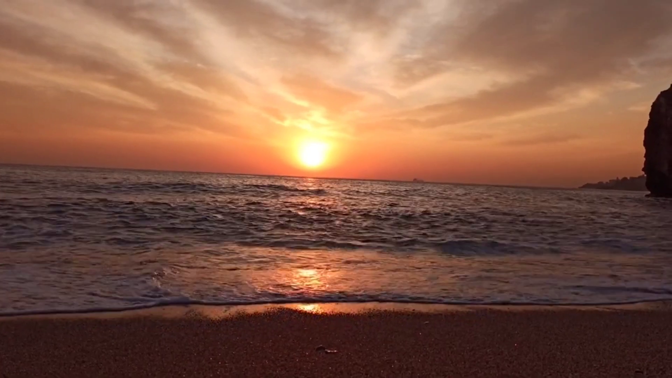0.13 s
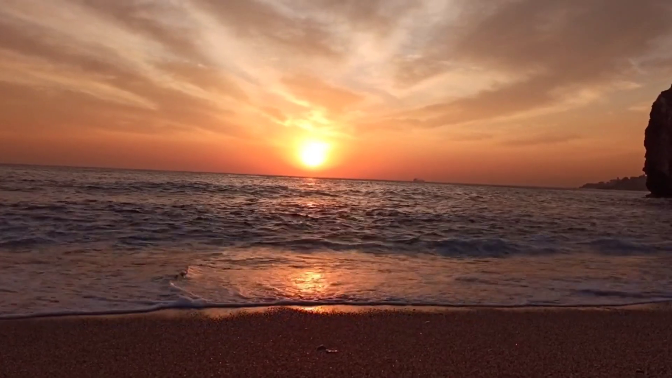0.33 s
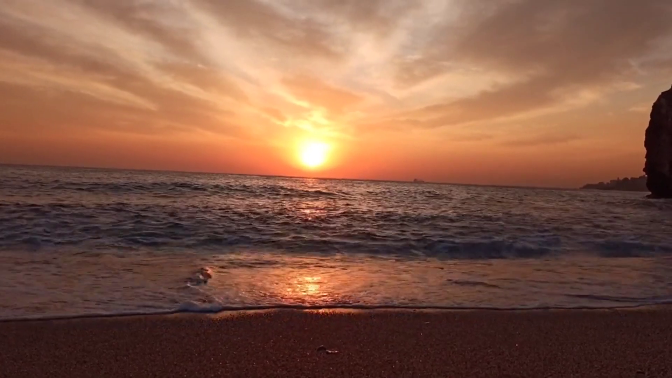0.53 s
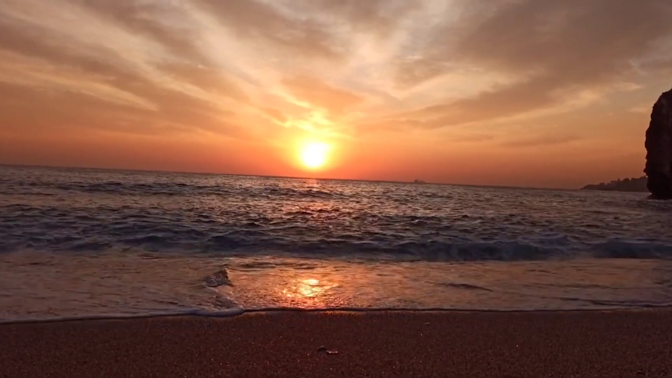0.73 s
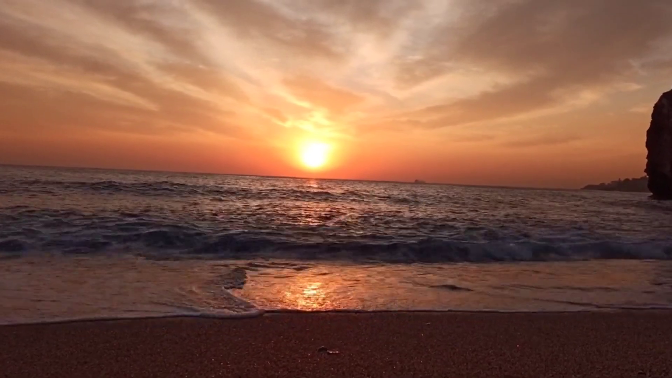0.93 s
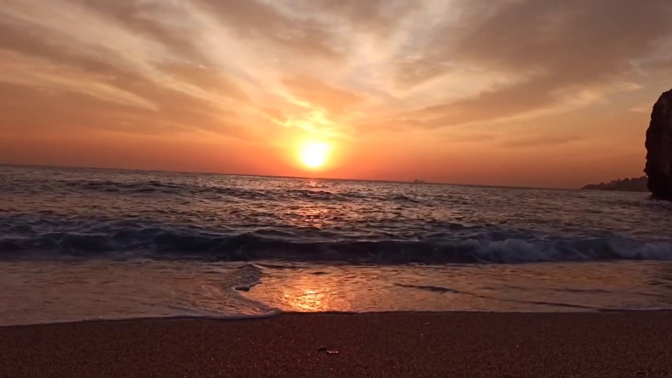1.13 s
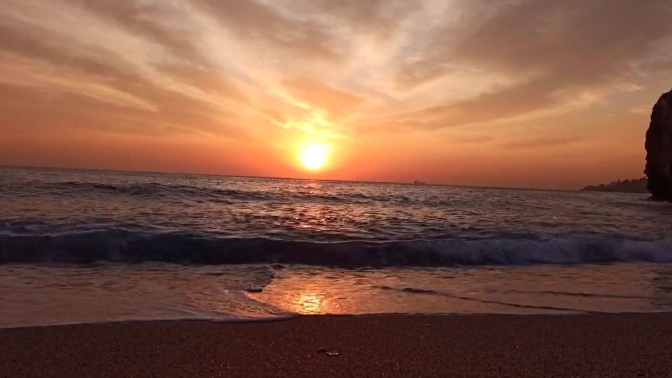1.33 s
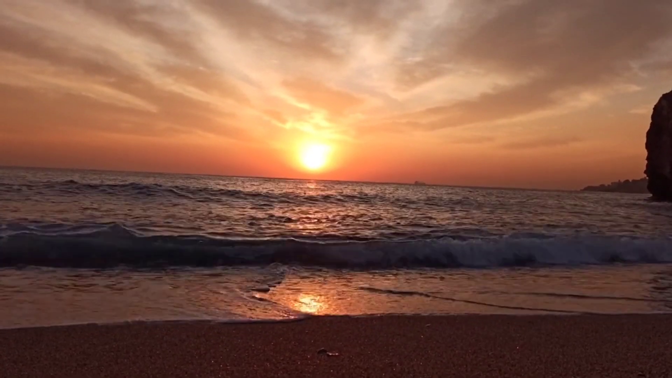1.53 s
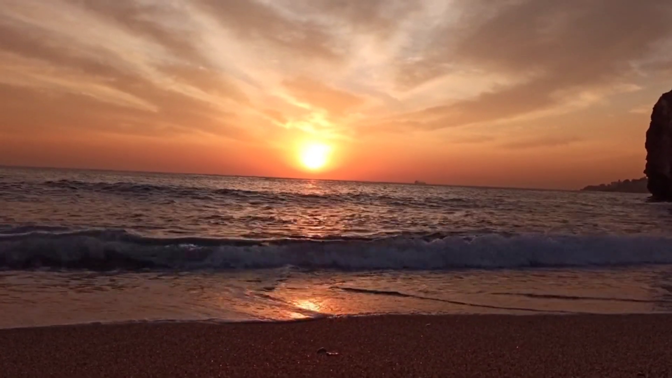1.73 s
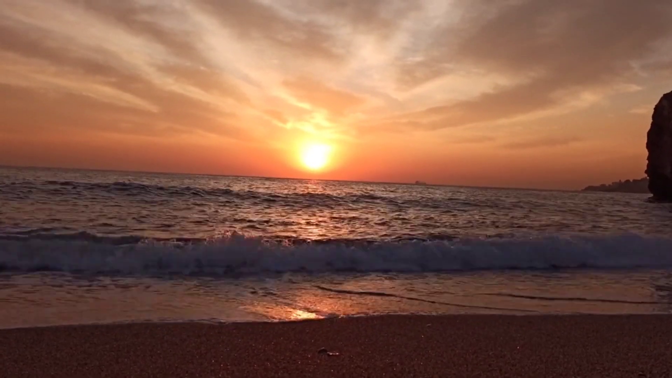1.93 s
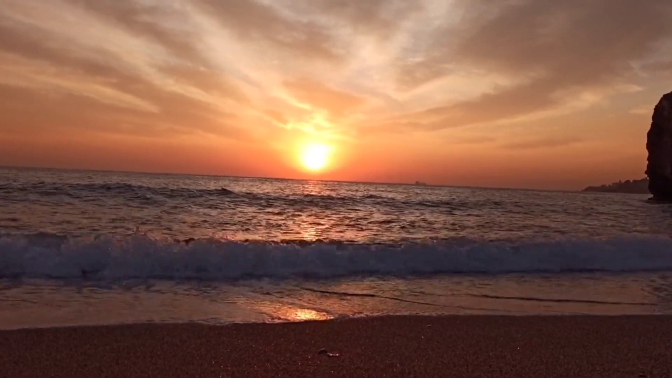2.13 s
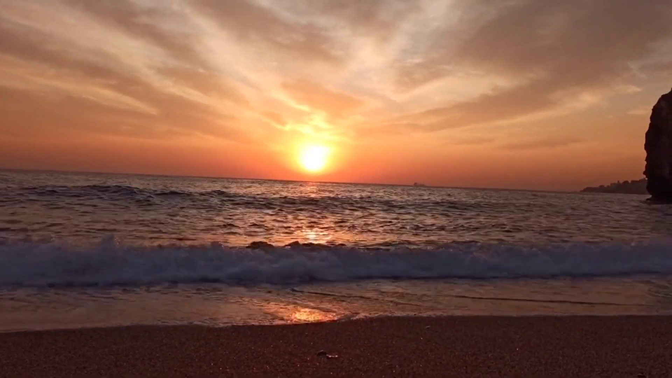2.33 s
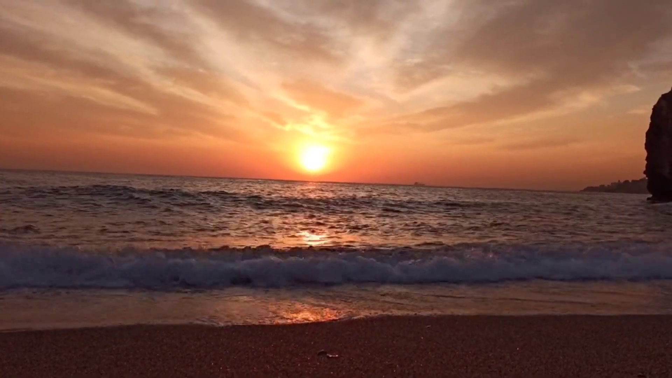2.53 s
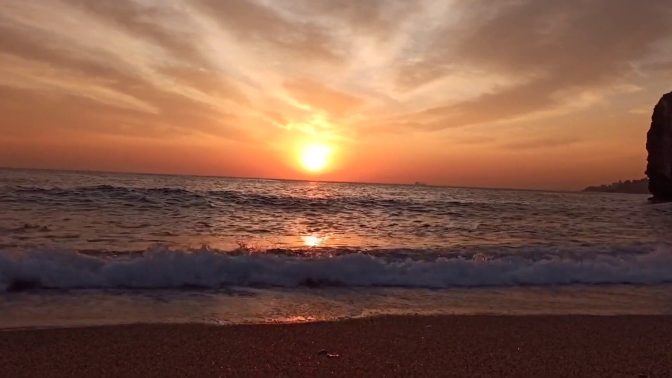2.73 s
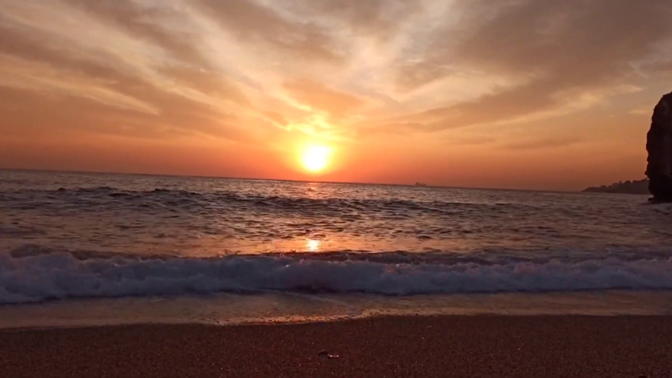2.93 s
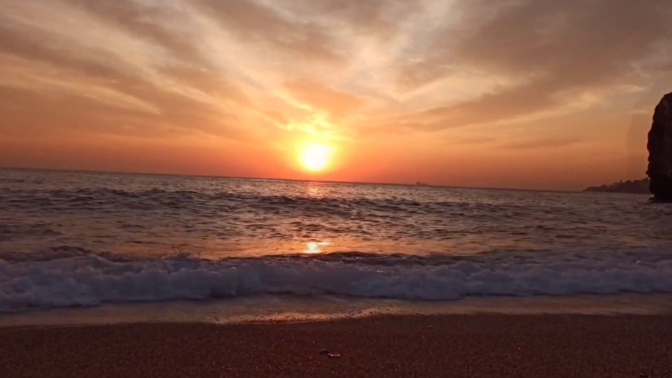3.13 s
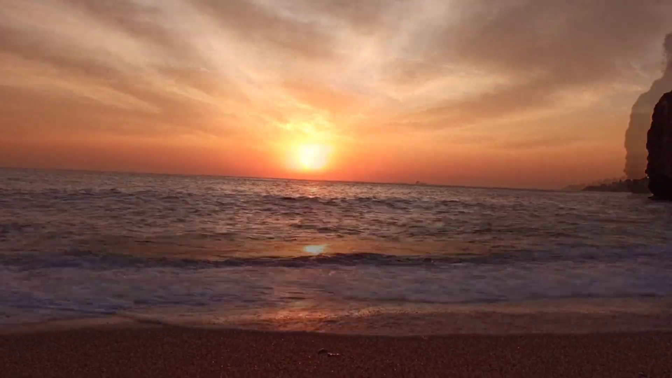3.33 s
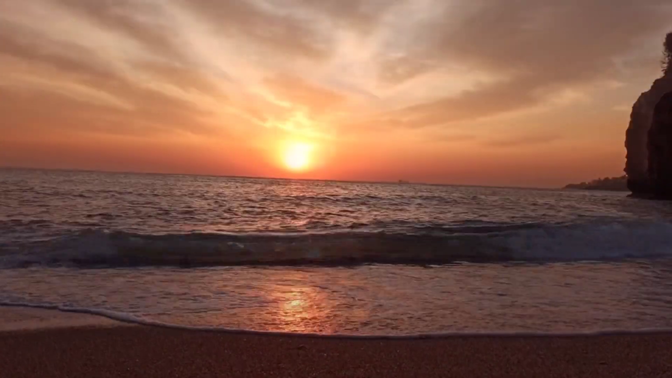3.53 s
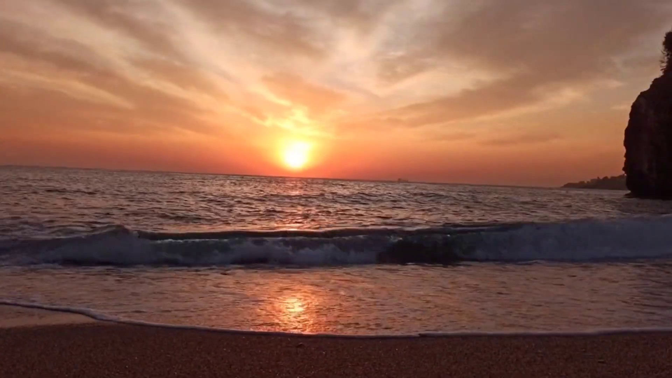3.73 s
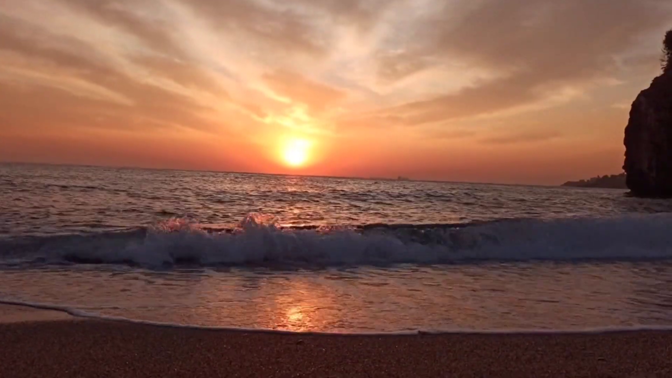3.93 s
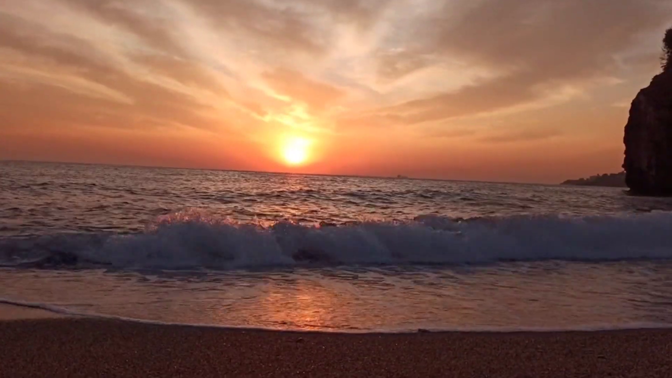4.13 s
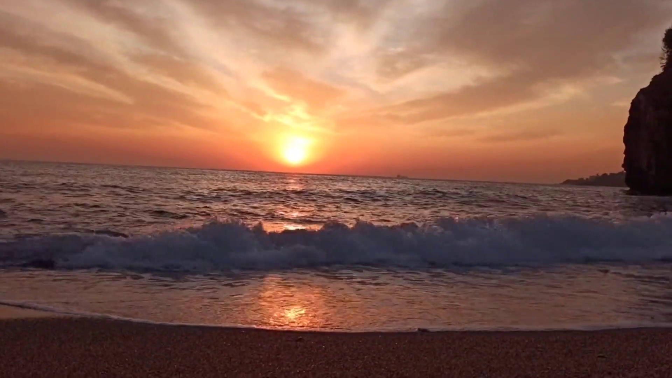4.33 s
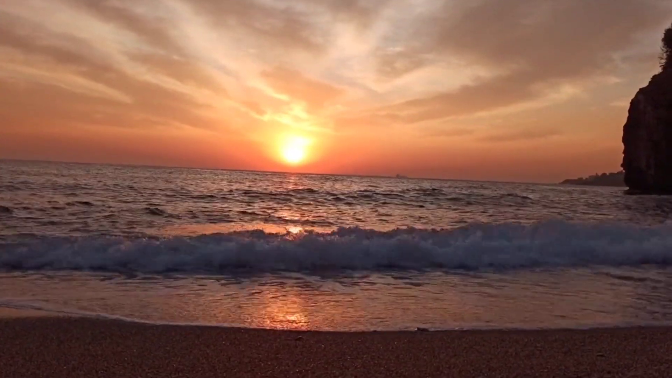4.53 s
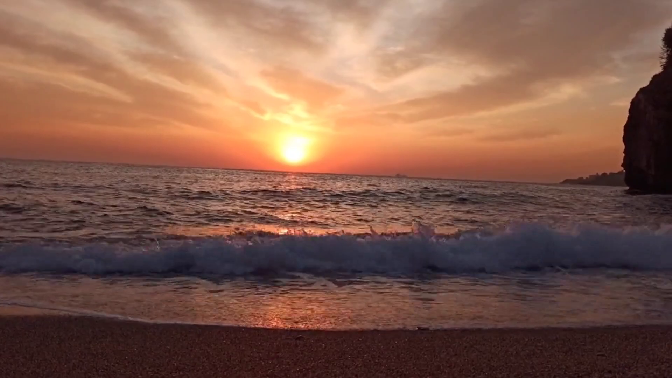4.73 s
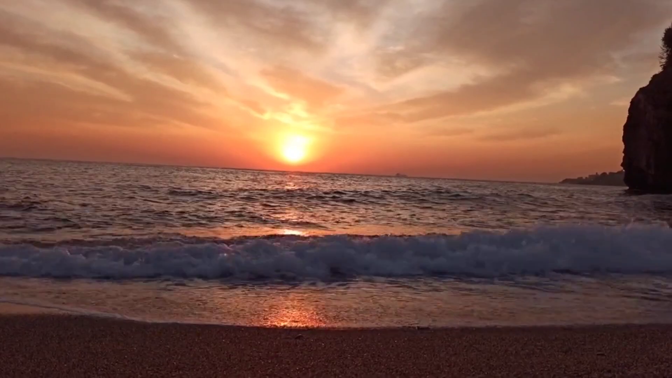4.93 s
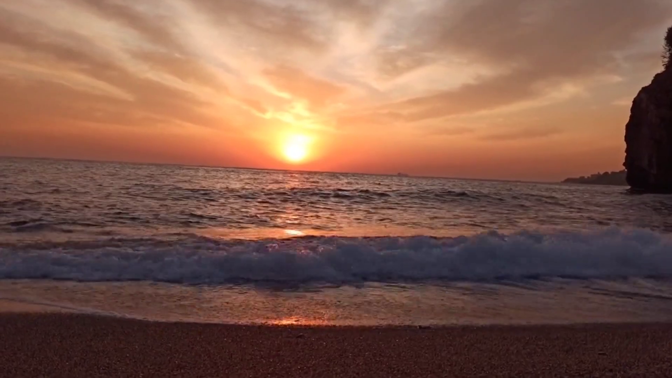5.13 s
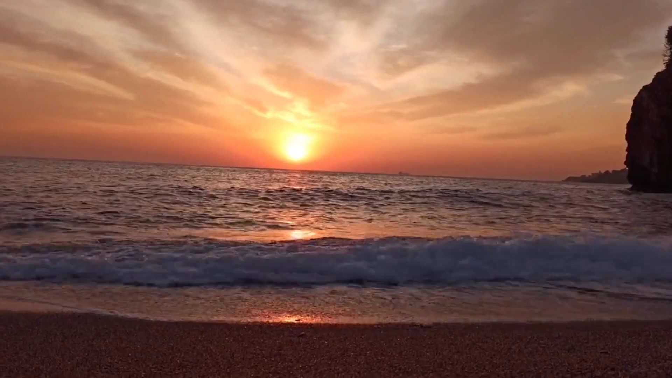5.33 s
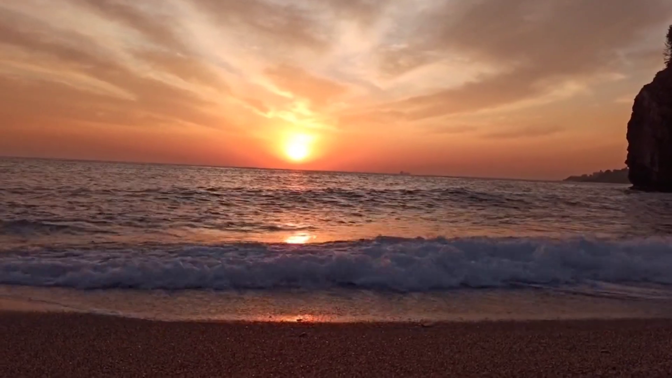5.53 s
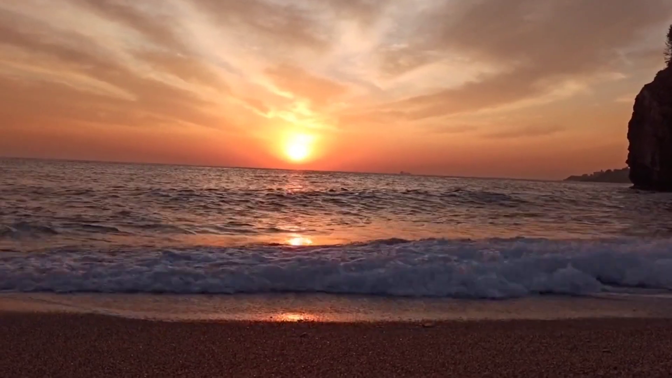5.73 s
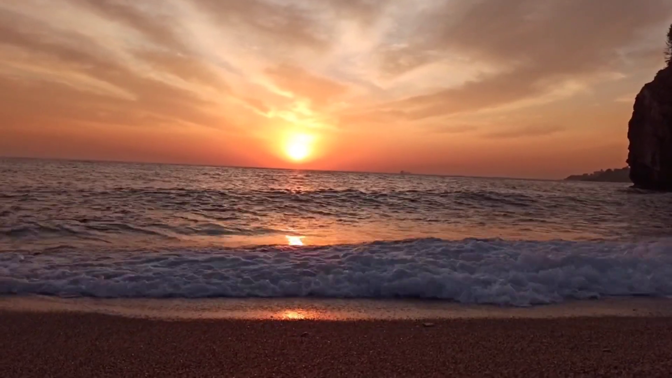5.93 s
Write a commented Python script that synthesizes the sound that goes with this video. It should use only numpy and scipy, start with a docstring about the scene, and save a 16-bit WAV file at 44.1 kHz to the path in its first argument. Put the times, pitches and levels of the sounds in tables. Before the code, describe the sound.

Small waves wash a sandy beach, heard in wide stereo from a few metres away, over a faint, even rumble of distant surf. At first, shallow water trickles softly back on both sides. From about 0.7 seconds a wave starts to spill and swell. It breaks at around 1.7 seconds, slightly left of centre, with a low boom and hollow gulps, followed by a gurgling roar and churning, hissing foam. The wash eases around 3 seconds as water drains away. A second, slightly heavier wave breaks at about 3.6 seconds, near the centre. Its bubbling roar and plopping air pockets are strongest between 4.2 and 5.1 seconds, with a distinct gulp near 4.5 seconds. Bright foam fizzes up the sand, then begins to ebb from about 5.5 seconds, with water trickling back until the end at 6 seconds.

```python
"""Small waves on a sandy beach.

One wave drains away, then two break in turn and wash up the sand, a few metres from two spaced microphones.
Each crest traps air: big pockets boom and gulp, the tumbling bubble cloud roars. The broken front churns, the
surf hisses up into the high treble, and water trickles back. The treble has a gap near 10 kHz. The noise comes
from the whole length of the shore, over the rumble of far surf."""
import sys
import numpy as np
from scipy import signal
from scipy.fft import rfft, irfft, next_fast_len
from scipy.io import wavfile

SR = 44100
rng = np.random.default_rng(int(sys.argv[2]) if len(sys.argv) > 2 else 0)


def wav_record(signal):
    """Record a signal, one row per channel, as 16-bit PCM in the file named by sys.argv[1]."""
    frames = np.transpose(np.atleast_2d(signal))
    bounded = np.clip(frames, -1, 1)
    # unit amplitude maps onto the largest positive 16-bit level
    quanta = np.round(bounded * 32767).astype(np.int16)
    wavfile.write(sys.argv[1], SR, quanta)


N = 267687
TIME = np.arange(N) / SR
FFT_SIZE = next_fast_len(N + 4096)
BIN_HZ = np.maximum(np.arange(FFT_SIZE // 2 + 1) * SR / FFT_SIZE, 1)


def from_db(db):
    """Decibels to gain."""
    return 10 ** (np.asarray(db) / 20)


def at_bins(curve):
    """A (frequency, value) curve at every FFT bin."""
    hz, value = np.transpose(curve)
    return np.interp(np.log(BIN_HZ), np.log(hz), value)


def filtered(x, gain_db):
    """Zero-phase filter, one gain per bin."""
    return irfft(rfft(x, FFT_SIZE) * from_db(gain_db), FFT_SIZE)[..., :N]


def coloured(x, spectrum):
    """Stereo signal shaped by a spectrum; channel mean at rms 1."""
    x = filtered(x, at_bins(spectrum))
    return x / np.std(x.mean(axis=0))


def drift(knots_per_s):
    """Piecewise-linear random curve, rms about 1."""
    knots = rng.standard_normal(2048)
    return np.interp(TIME * knots_per_s, np.arange(len(knots)), knots) / np.sqrt(2 / 3)


def ring(clicks, hz, t60_s):
    """Resonator: a unit click starts a decaying unit sine."""
    r, w = from_db(-60 / (t60_s * SR)), 2 * np.pi * hz / SR
    return signal.lfilter([0, np.sin(w)], [1, -2 * r * np.cos(w), r * r], clicks + 1e-18)


def arrive(x, bearing, mic_lag_s=.00046):
    """Sound from one side reaches the nearer microphone first."""
    lag = bearing * mic_lag_s * SR
    left_lag = round(lag / 2)
    return np.array([np.roll(x, left_lag), np.roll(x, left_lag - round(lag))])


# Loudest part of the shore: (time [s], bearing [-1 left, 1 right], width [same scale])
SHORE_FOCUS = [(0, -.3, 2.3), (.7, -0.13, 1.1), (1.2, 0.16, 0.54), (1.8, -0.3, 0.41), (2.7, -0.29, 0.41),
               (3.4, -.1, 0.53), (4.2, -0.11, 0.44), (5.0, 0.081, 0.47), (6.05, .15, 0.55)]

def shoreline(count=14):
    """Stretches of shore, left to right: bearings and gains over time, total power 1."""
    bearings = np.sin(np.linspace(-1.35, 1.35, count))
    times_s, centres, widths = np.transpose(SHORE_FOCUS)
    centre, width = np.interp(TIME, times_s, centres), np.interp(TIME, times_s, widths)
    shares = np.exp(-.5 * ((bearings[:, None] - centre) / width) ** 2)
    return bearings, np.sqrt(shares / shares.sum(axis=0))


def flanks(shore):
    """The shore weighted to its far left and right."""
    bearings, _ = shore
    shares = np.abs(bearings) ** 4.5
    return bearings, np.sqrt(shares / shares.sum())


def rush(shore, scatter):
    """Countless bubbles merge to noise on each stretch; the scattered share arrives uncorrelated."""
    direct = sum(arrive(gain * rng.standard_normal(N), bearing) for bearing, gain in zip(*shore))
    return np.sqrt(1 - scatter) * direct + np.sqrt(scatter) * rng.standard_normal((2, N))


def bubbles(low_hz, high_hz, per_s, t60_cycles, spread_db, sizes=14):
    """Near bubbles ring at random times, each size from a random bearing; rms 1."""
    out = np.zeros((2, N))
    for hz, bearing in zip(np.geomspace(low_hz, high_hz, sizes), rng.uniform(-1, 1, sizes)):
        chance = rng.random(N) * sizes * SR / per_s
        born = np.flatnonzero(chance < 1)
        level_db = spread_db * np.minimum(-np.log(chance[born] + 1e-9), 4)   # loud ones are rare
        clicks = np.zeros(N)
        clicks[born] = from_db(level_db) * (-1.) ** born
        out += arrive(ring(clicks, hz, t60_cycles / hz), bearing) * hz / high_hz
    return out / np.std(out)


# Far surf spectrum: (frequency [Hz], level [dB])
SEA_SPECTRUM = [(18, -18), (33, -12), (60, -1), (85, 6.3), (130, 1.2), (200, -4.5), (300, -14), (800, -50),
                (4000, -81)]

def open_sea(shore, level_db=-64.3):
    """Far surf merges into a low, even rumble."""
    return from_db(level_db) * coloured(rush(shore, scatter=.14), SEA_SPECTRUM)


# Waves: (break [s], spent [s], build-up [dB/s], ebb [dB/s], weight [dB], landing jump [dB])
WAVE_TRAIN = [(-2, -.54, 20, 27, 0, 0), (1.65, 2.94, 21, 19.2, 0, 0), (3.62, 5.48, 23.4, 11.4, 2.2, 2.9)]
# Toppling stretches of crest, thick ones deep, thin ones bright:
# (time [s], peak [dB], half-length [s], centre [Hz], loss one octave off centre [dB])
CREST_PLUNGES = [(.66, -58, .1, 600, 6), (.93, -57.5, .1, 1100, 5), (1.0, -61, .095, 2300, 2),
                 (1.03, -53, .09, 300, 3), (1.19, -52, .09, 800, 3), (1.29, -58, .06, 4500, 3),
                 (1.38, -49.5, .06, 400, 3), (1.69, -51.5, .047, 70, 2), (1.66, -55, .06, 2300, 4),
                 (1.81, -49.5, .035, 75, 2), (1.83, -51.5, .04, 6800, 11), (1.9, -50.5, .05, 1400, 2.8),
                 (2.06, -50, .06, 90, 3), (2.2, -54, .1, 3600, 3), (2.28, -41.8, .07, 185, 2.2),
                 (2.43, -41.5, .1, 330, 1.5), (2.85, -46, .04, 480, 1.8), (3.73, -47.5, .06, 220, 1.3),
                 (3.93, -44.8, .08, 450, 2.6), (4.11, -47, .05, 68, 1.6), (4.23, -42.3, .09, 270, 2.6),
                 (4.27, -54.5, .24, 3800, 1.6), (4.385, -39, .08, 330, 2.2), (4.51, -46, .07, 90, 2),
                 (4.67, -43.8, .05, 135, 1.3), (4.795, -42, .04, 700, 3), (4.8, -51.8, .13, 2700, 5),
                 (4.92, -44.5, .08, 540, 1.8), (5.04, -42.5, .07, 260, 1.8), (5.17, -49, .04, 80, 1.5),
                 (5.29, -47, .06, 230, 2), (5.5, -47.5, .1, 270, 1.6), (5.62, -54, .05, 1500, 2.5)]

def swell(hz, level_db, calm_db, delay_s, steepness, sag_db_per_s, weight_share, ebb_share, spill_db=0):
    """Surf gain near hz: builds until delay_s after a break, sags, then ebbs; plunges add surges."""
    spill_lead_s, spill_half_s, landing_half_s = .78, .08, .03
    power = from_db(calm_db) ** 2
    for break_s, spent_s, build_db_per_s, ebb_db_per_s, weight_db, jump_db in WAVE_TRAIN:
        age_s = TIME - break_s - delay_s
        unspilled = .5 - .5 * np.tanh((TIME - break_s + spill_lead_s) / spill_half_s)
        airborne = .5 - .5 * np.tanh((TIME - break_s) / landing_half_s)
        build_db = steepness * build_db_per_s * np.minimum(age_s, 0)
        build_db -= spill_db * unspilled + jump_db * airborne   # steps up as the crest spills and lands
        sag_db = sag_db_per_s * np.maximum(age_s, 0)
        ebb_db = ebb_share * ebb_db_per_s * np.maximum(TIME - spent_s, 0)
        power += from_db(level_db + weight_share * weight_db + build_db - sag_db - ebb_db) ** 2
    for time_s, peak_db, half_s, centre_hz, octave_loss_db in CREST_PLUNGES:
        height = from_db(peak_db - octave_loss_db * np.log2(hz / centre_hz) ** 2)
        power += height ** 2 * np.exp(-((TIME - time_s) / half_s) ** 2)
    return np.sqrt(power)


# Draining water spectrum: (frequency [Hz], level [dB])
BACKWASH_SPECTRUM = [(300, -25), (620, 2), (850, 0), (1050, -1), (1320, .3), (1600, -1.5), (1780, -1),
                     (2080, -2.5), (2300, -12), (3200, -16), (4600, -16), (8000, -48)]

def backwash(shore, level_db=-56, lead_s=.16, gather_db_per_s=7, drain_db_per_s=9.5, weight_share=-1.2):
    """Shallow water gathers until a wave is nearly spent, then trickles back on both sides."""
    flow = 0
    for _, spent_s, _, _, weight_db, _ in WAVE_TRAIN:
        age_s = TIME - spent_s + lead_s
        shape_db = np.minimum(gather_db_per_s * age_s, -drain_db_per_s * age_s)
        flow = np.maximum(flow, from_db(level_db + weight_share * weight_db + shape_db))
    trickle = from_db(-19) * bubbles(1600, 2420, per_s=600, t60_cycles=33, spread_db=3.5)
    return coloured(rush(flanks(shore), scatter=.05) + trickle, BACKWASH_SPECTRUM) * flow


# Top band of the surf's hiss, about 11.5-15.5 kHz: (frequency [Hz], level [dB])
TOP_HISS_SPECTRUM = [(9000, -45), (11200, -50), (11650, 7.5), (13300, 7.5), (15400, 6), (16500, -30)]

def top_hiss(shore):
    """A thin, very high band of hiss swells with each wave."""
    gain = swell(hz=13000, level_db=-58.3, calm_db=-76.2, delay_s=.14, steepness=1.08,
                 sag_db_per_s=3, weight_share=.55, ebb_share=.95, spill_db=7)
    return coloured(rush(shore, scatter=.95), TOP_HISS_SPECTRUM) * gain


# Two bands of surf hiss; the lower steps down at 4.7 kHz, the upper is cut off above 8.6 kHz:
# (frequency [Hz], level [dB])
LOWER_HISS_SPECTRUM = [(200, -48), (900, -5), (1300, -1.5), (1560, -3), (1750, 2.6), (1900, 0), (2100, 1),
                       (2380, -1.8), (3050, 1.4), (4000, 1.2), (4710, 1.8), (4850, -6.8), (5900, -11),
                       (7000, -30), (9000, -70)]
UPPER_HISS_SPECTRUM = [(2500, -40), (4600, -14), (5000, -8), (5900, -6.2), (6400, 0), (7500, -.8),
                       (7900, -4.3), (8550, -5.8), (8850, -30), (9500, -62)]

def surf_hiss(shore):
    """The surf hisses in two bands; small bubbles ring in the lower one."""
    lower_gain = swell(hz=3000, level_db=-47.9, calm_db=-68.8, delay_s=.14, steepness=1.08,
                       sag_db_per_s=.9, weight_share=-.95, ebb_share=1.1, spill_db=5)
    upper_gain = swell(hz=7000, level_db=-49.2, calm_db=-67.9, delay_s=.13, steepness=1.02,
                       sag_db_per_s=1.4, weight_share=-.8, ebb_share=1.05, spill_db=7)
    crackle = from_db(-13) * bubbles(1900, 4700, per_s=3200, t60_cycles=24, spread_db=2.6)
    lower = coloured(rush(shore, scatter=.7) + crackle, LOWER_HISS_SPECTRUM)
    upper = coloured(rush(shore, scatter=.76), UPPER_HISS_SPECTRUM)
    return lower * lower_gain + upper * upper_gain


# Broken front spectrum: (frequency [Hz], level [dB])
CHURN_SPECTRUM = [(60, -63), (330, -21.5), (520, -1.5), (680, -2.5), (930, -1.4), (1080, -6.6),
                  (1300, -6.8), (1560, -10.8), (2100, -13), (3200, -24), (6000, -76), (9000, -72)]

def churn(shore):
    """The broken front churns up the sand with plopping bubbles."""
    gain = swell(hz=855, level_db=-41.2, calm_db=-69, delay_s=.22, steepness=.95,
                 sag_db_per_s=2.7, weight_share=-.7, ebb_share=1.14, spill_db=1.5)
    plops = from_db(-16.5) * bubbles(632, 2226, per_s=1500, t60_cycles=31, spread_db=2)
    return coloured(rush(shore, scatter=.022) + plops, CHURN_SPECTRUM) * gain


def white_water(shore):
    """Churn and hiss share small surges; the hiss also flickers as foam bursts in clumps."""
    surge_db = .45 * drift(40) + .4 * drift(17)
    clump_db = .5 * drift(420)
    wash = churn(shore) + surf_hiss(shore) * from_db(clump_db) + top_hiss(shore) * from_db(1.7 * clump_db)
    return wash * from_db(surge_db)


# Collapsing air pockets: (time [s], level [dB], start pitch [Hz], t60 [s])
AIR_POCKETS = [(1.353, -35, 326, .05), (1.643, -27, 340, 0.042), (1.65, -36, 166, .2),
               (1.688, -34, 144, 0.19), (1.818, -24, 430, .04), (2.056, -23.5, 305, .05),
               (2.264, -27, 290, 0.06), (2.393, -27, 500, .05), (2.481, -24, 490, 0.042),
               (2.842, -28, 460, 0.051), (3.855, -29, 205, .06), (3.968, -26, 332, .06),
               (4.105, -32, 108, 0.11), (4.294, -25, 370, .05), (4.373, -23, 400, .05),
               (4.394, -25, 330, 0.059), (4.457, -16.5, 290, 0.031), (4.671, -29, 347, 0.078),
               (4.786, -24, 391, .07), (4.92, -29, 195, .07), (4.998, -25, 350, .05),
               (5.078, -25, 330, .05), (5.306, -32, 175, .08)]

def gulps(attack_s=.0049, pitch_sag_per_s=2.2):
    """Each large air pocket closes with a short tone that sinks in pitch."""
    out = np.zeros(N)
    for time_s, level_db, hz, t60_s in AIR_POCKETS:
        age_s = np.maximum(TIME - time_s, 0)
        attack = 1 - np.exp(-age_s / attack_s)
        decay_db = 60 * np.minimum(age_s / t60_s, 3)
        cycles = hz * (1 - np.exp(-pitch_sag_per_s * age_s)) / pitch_sag_per_s
        out += from_db(level_db - decay_db) * attack * np.sin(2 * np.pi * cycles)
    return out


# Trapped air spectrum: (frequency [Hz], level [dB])
BOOM_SPECTRUM = [(22, -51), (40, -33), (60, -21), (80, -9), (102, -1), (130, -2), (165, -1), (230, -9),
                 (450, -57), (1500, -82)]

def boom(shore):
    """Big volumes of air boom under the falling crest."""
    gain = swell(hz=111, level_db=-49.4, calm_db=-59.7, delay_s=.17, steepness=2.3,
                 sag_db_per_s=3, weight_share=1.6, ebb_share=1.35)
    return coloured(rush(shore, scatter=.03), BOOM_SPECTRUM) * gain


# Bubble cloud spectrum: (frequency [Hz], level [dB])
ROAR_SPECTRUM = [(30, -51), (100, -43), (170, -3), (215, -.8), (290, 1.8), (360, 2), (440, -0.7),
                 (505, -.2), (570, -4.5), (750, -7.3), (1200, -28), (5000, -70)]

def roar(shore):
    """The trapped air splits into a tumbling bubble cloud that roars and gurgles just after the boom."""
    gain = swell(hz=330, level_db=-39.5, calm_db=-55.6, delay_s=.44, steepness=.85,
                 sag_db_per_s=4.4, weight_share=.8, ebb_share=1.1)
    gurgle = from_db(-28.5) * bubbles(198, 604, per_s=490, t60_cycles=7.7, spread_db=1.5)
    tumble_db = .7 * drift(20) + .35 * drift(45)
    return coloured(rush(shore, scatter=.0097) + gurgle, ROAR_SPECTRUM) * gain * from_db(tumble_db)


def scene():
    """The surf along the shore, in stereo."""
    shore = shoreline()
    return open_sea(shore) + boom(shore) + roar(shore) + gulps() + white_water(shore) + backwash(shore)


# Reflection off a body: (frequency [Hz], gain [dB])
BODY_RESPONSE = [(300, -34), (900, -24), (1600, -14), (3300, -13), (5000, -19), (9000, -34)]

def body_echo(dry, left_s=.0033, right_s=.00298):
    """The surf bounces faintly off the person holding the microphones."""
    echo = filtered(dry.mean(axis=0), at_bins(BODY_RESPONSE))
    return np.array([np.interp(TIME - delay_s, TIME, echo) for delay_s in (left_s, right_s)])


# Microphone mismatch: (frequency [Hz], left minus right [dB])
MIC_BALANCE = [(60, -1.4), (250, -.4), (900, -0.5), (1700, -0.5), (2800, 2), (4300, 1), (6000, -1.5),
               (7400, 6.8), (8500, -4), (11800, -7), (15000, -9)]

def record(dry, cutoff_hz=15600):
    """Each microphone colours the surf and its echo; a steep low-pass cuts the top."""
    half_db = at_bins(MIC_BALANCE) / 2
    heard = filtered(dry + body_echo(dry), [half_db, -half_db])
    low_pass = signal.ellip(12, .1, 90, cutoff_hz, fs=SR, output="sos")
    return signal.sosfilt(low_pass, heard)


dry = scene()
out = record(dry)
wav_record(out)
```